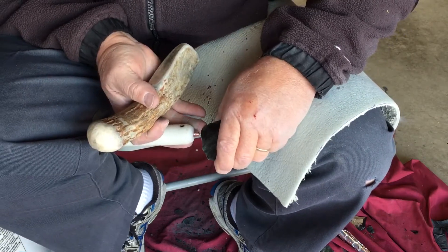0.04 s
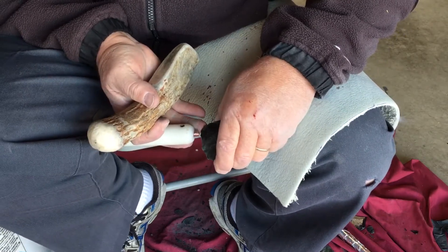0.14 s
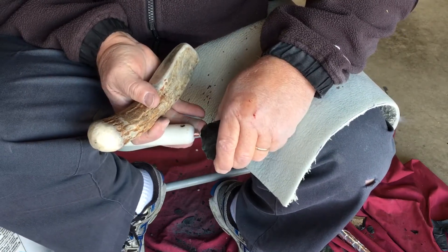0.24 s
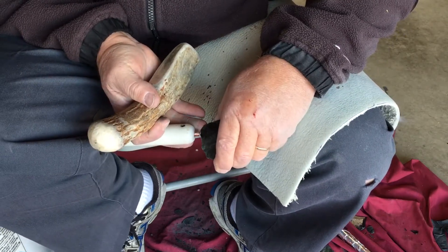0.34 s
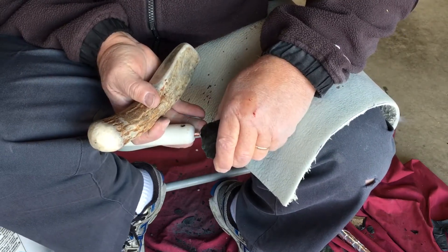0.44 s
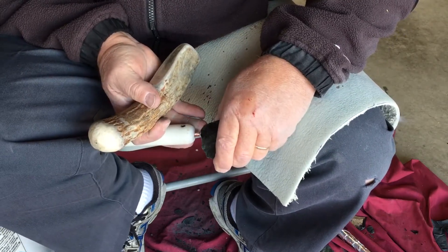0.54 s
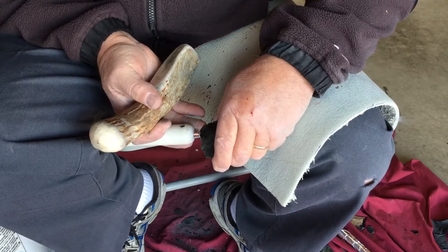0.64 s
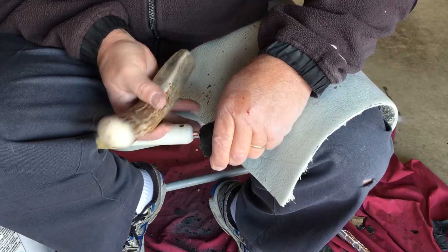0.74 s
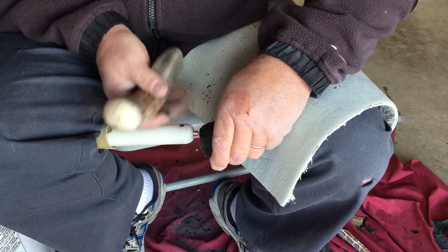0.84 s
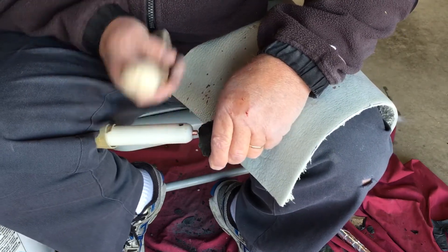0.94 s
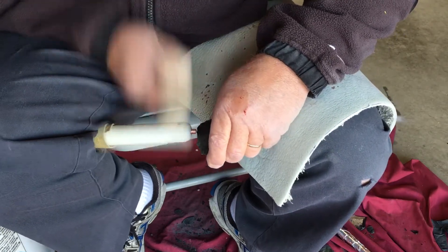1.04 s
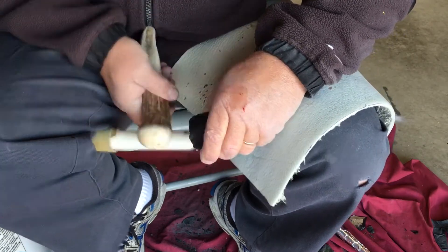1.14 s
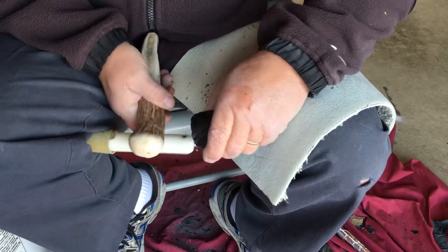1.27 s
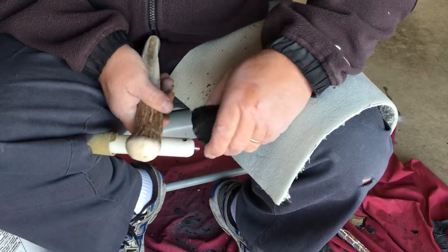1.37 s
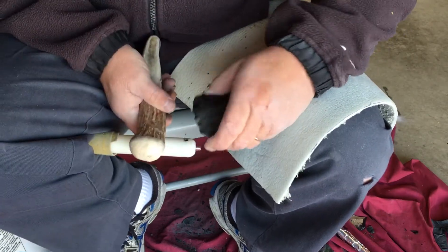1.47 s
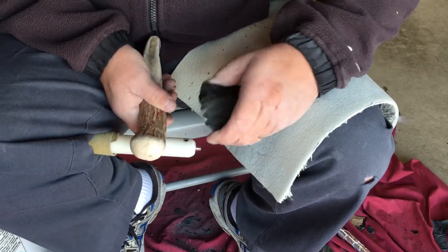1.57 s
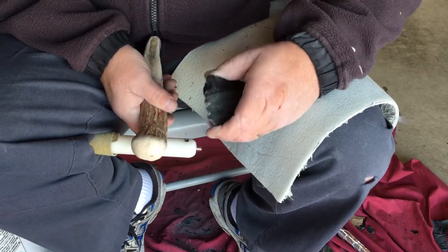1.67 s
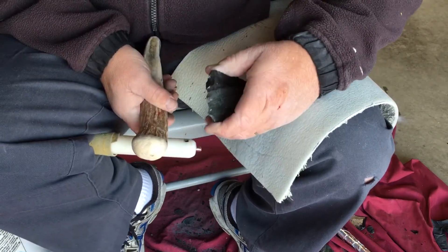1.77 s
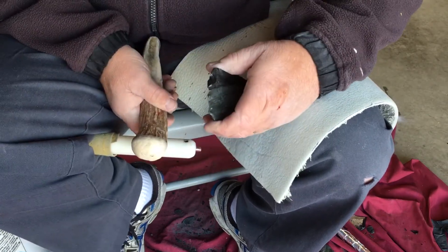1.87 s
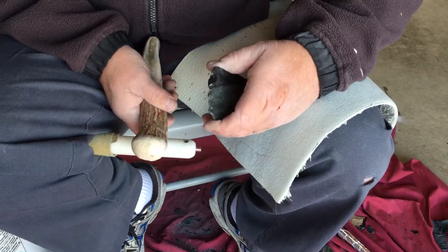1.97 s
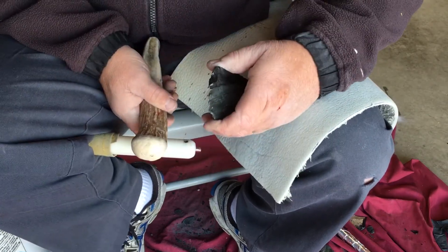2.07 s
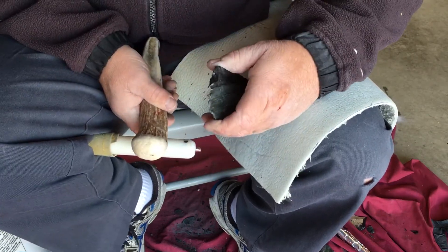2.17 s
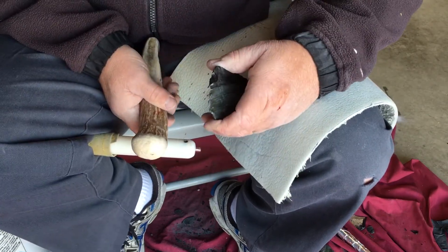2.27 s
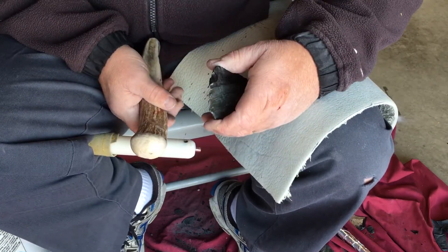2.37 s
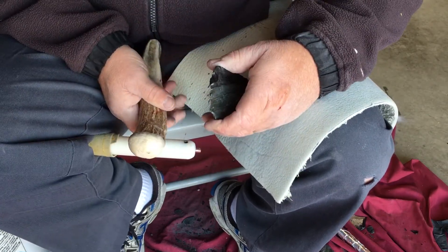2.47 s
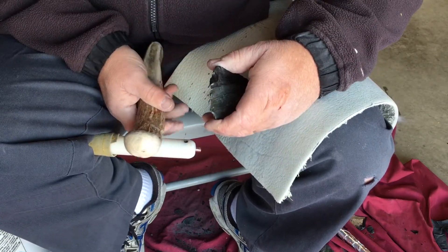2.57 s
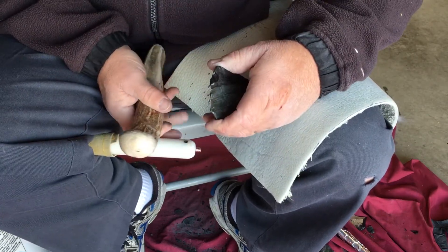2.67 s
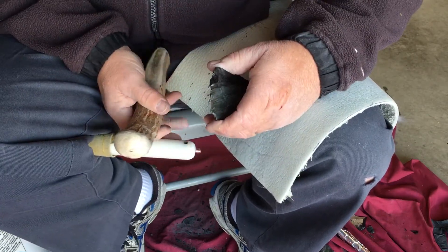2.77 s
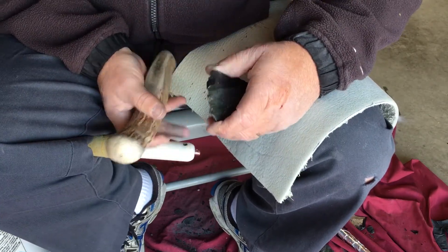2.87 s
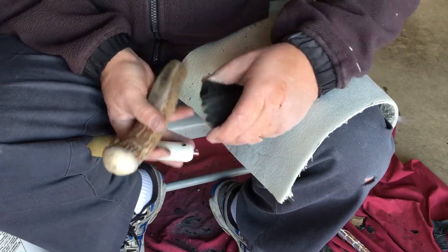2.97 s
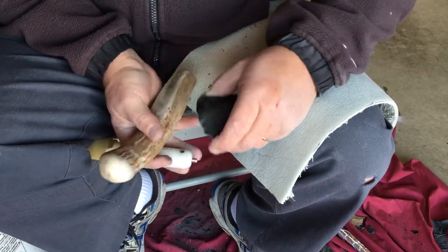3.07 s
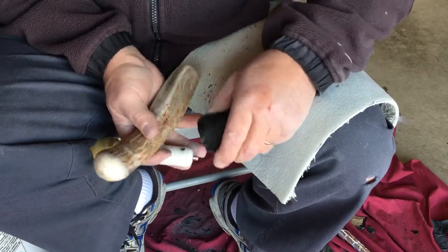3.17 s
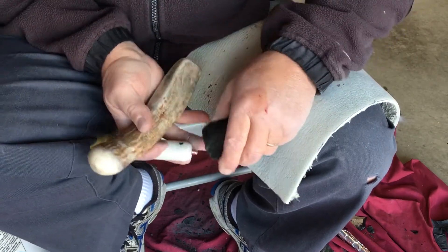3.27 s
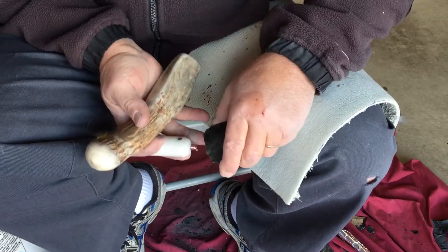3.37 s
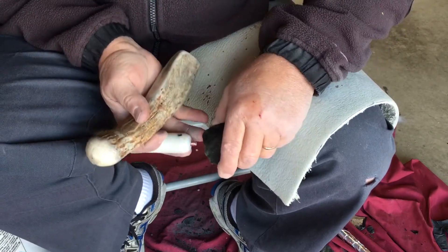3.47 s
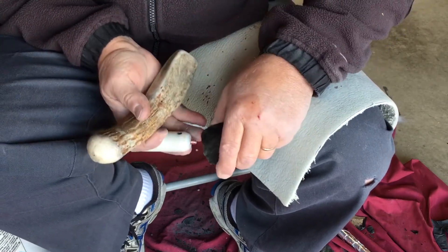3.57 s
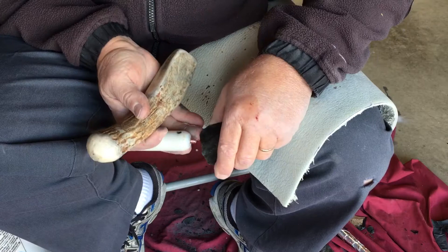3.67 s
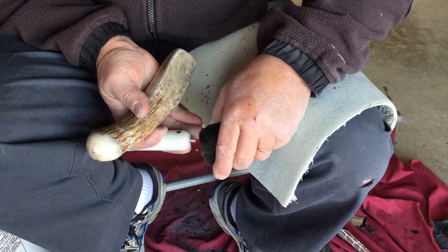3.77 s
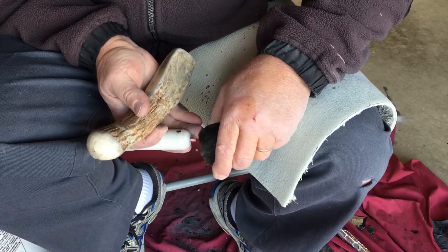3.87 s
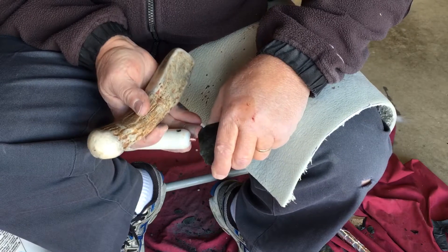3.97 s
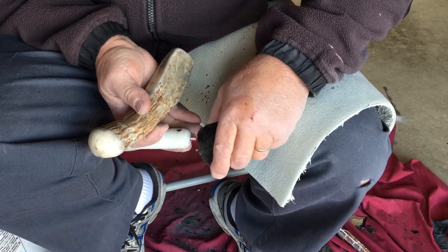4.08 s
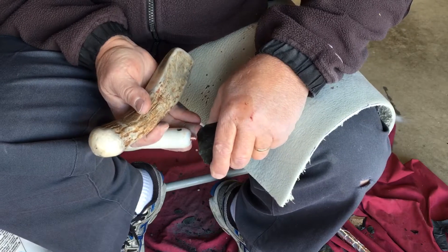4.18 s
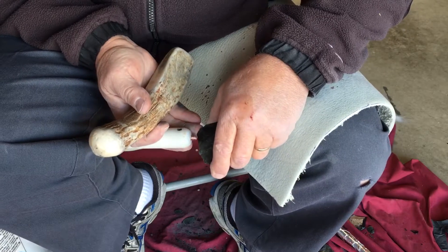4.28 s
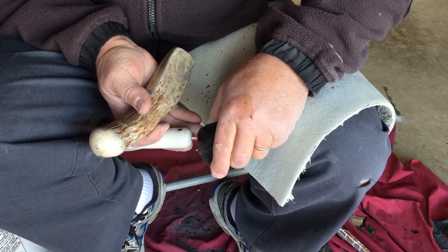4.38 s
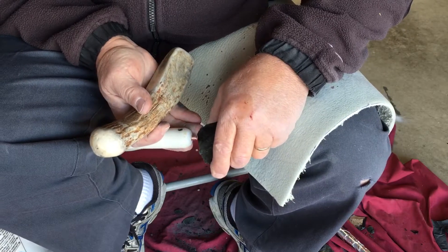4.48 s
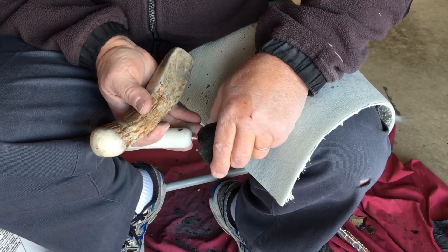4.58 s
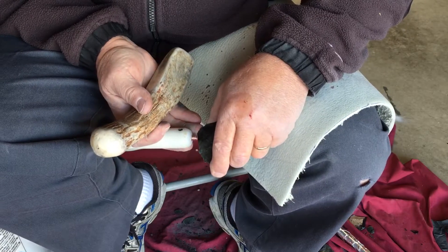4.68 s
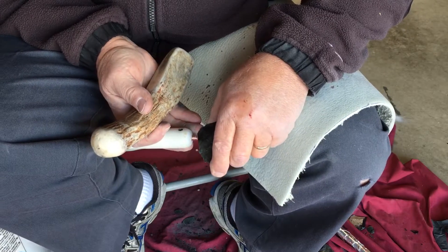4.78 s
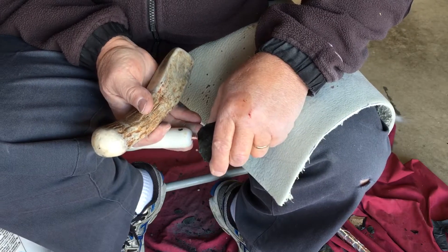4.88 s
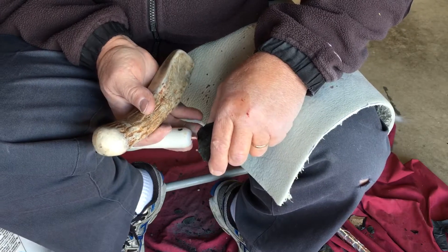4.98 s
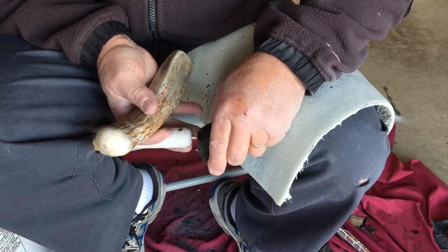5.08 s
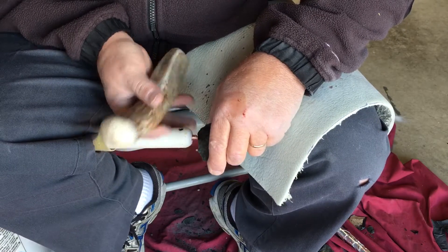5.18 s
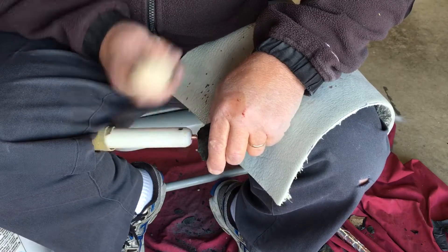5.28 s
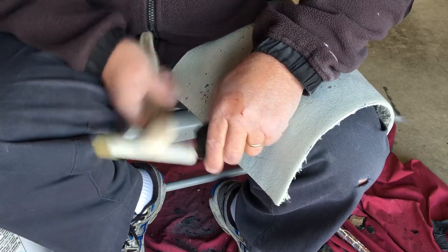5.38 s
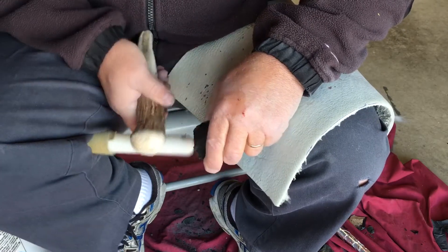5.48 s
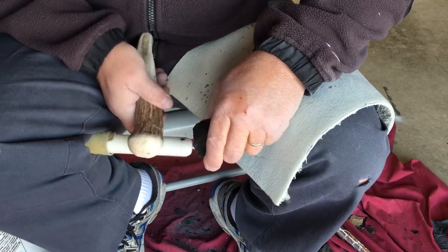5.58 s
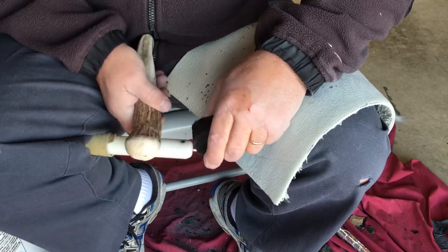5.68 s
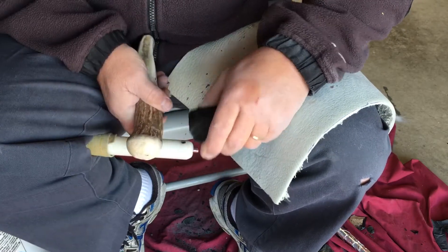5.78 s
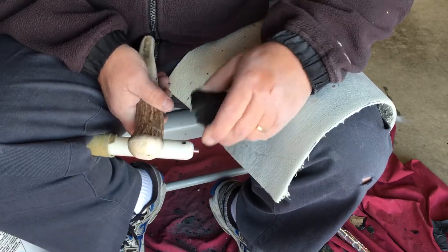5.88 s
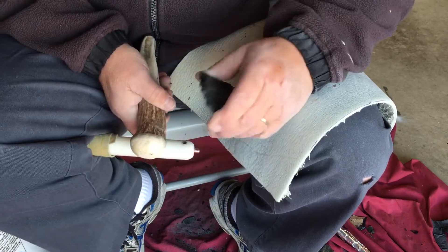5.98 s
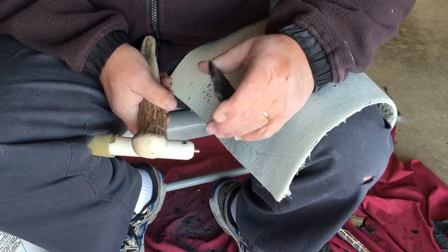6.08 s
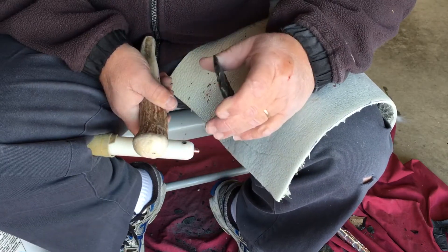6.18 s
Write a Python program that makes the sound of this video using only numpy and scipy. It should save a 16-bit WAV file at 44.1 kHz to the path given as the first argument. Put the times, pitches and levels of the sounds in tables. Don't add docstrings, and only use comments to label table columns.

```python
import sys
import numpy as np
from scipy import signal
from scipy.fft import rfft, irfft
from scipy.io import wavfile

SR = 44100
rng = np.random.default_rng(int(sys.argv[2]) if len(sys.argv) > 2 else 0)


def bounce(signal):
    frames = np.transpose(np.atleast_2d(signal))
    limited = np.clip(frames, -1, 1)
    pcm = np.round(limited * 32767).astype(np.int16)
    wavfile.write(sys.argv[1], SR, pcm)


def nominal_scale(level):
    x = np.asarray(level, float) / 20
    return 10 ** x


N = 274698


def sos(x, edges, kind, order=2):
    edges = np.clip(edges, 10, .45 * SR)
    return signal.sosfilt(signal.butter(order, edges, kind, fs=SR, output="sos"), x)


def rms_one(x):
    return x / np.sqrt(np.mean(x ** 2) + 1e-20)


def at_hz(points, hz):
    table_hz, value = np.transpose(points)
    return np.interp(np.log(hz), np.log(table_hz), value, left=-80, right=-80)


def drift(rate):
    r = np.exp(-80 * np.pi * rate / SR)
    slow = signal.lfilter([1], [1, -2 * r, r * r], rng.standard_normal(N // 40 + 2002))[2000:]
    return np.interp(np.arange(N) / 40, np.arange(len(slow)), rms_one(slow))


def ring(clicks, hz, t60):
    r = nominal_scale(-60 / (max(t60, .002) * SR))
    w = 2 * np.pi * hz / SR
    return signal.lfilter([0, np.sin(w)], [1, -2 * r * np.cos(w), r * r], clicks + 1e-18)


def dying(t60, size):
    return nominal_scale(-60 * np.arange(size) / SR / max(t60, .001))


def coloured_noise(spectrum, patchy_db):
    hz = np.fft.rfftfreq(N, 1 / SR) + 1
    noise = irfft(rfft(rng.standard_normal(N)) * nominal_scale(at_hz(spectrum, hz)), N)
    return rms_one(noise * nominal_scale(patchy_db * drift(22)))


def blows(contacts, body):
    s, peak_db, hard_db, thud_db, crack_db = np.transpose(contacts)
    start, size = round((s[0] - .005) * SR), SR // 2
    at = np.round(s * SR).astype(int) - start
    out = np.zeros(size)
    uneven = rng.normal(0, 1, (len(at), len(body)))
    for k, (hz, level_db, t60) in enumerate(body):
        clicks = np.zeros(size)
        colour_db = hard_db * max(np.log2(hz / 2400), 0) + thud_db * (hz < 1500)
        clicks[at] = nominal_scale(peak_db + level_db + colour_db + 1.3 * uneven[:, k]) * (-1) ** k
        out += ring(clicks, hz, t60)
    cracks = rng.standard_normal((len(at), 1500)) * dying(.02, size=1500)
    for i, gain, burst in zip(at, nominal_scale(peak_db + crack_db - 2), cracks):
        out[i:i + 1500] += gain * sos(burst, [1210, 6462], "band", order=1)
    out = sos(out, 230, "high", order=4)
    return np.pad(out, (start, N - start - size))


# start in seconds, then peak, hardness, dull thud and crack, all in dB.
FIRST_STRIKE = [
    (1.0375, -3, 1.5, -5, 2.5),
    (1.0389, -11.5, 1, -2, -0.5),
    (1.0409, -8, -1, 3, -1),
    (1.0432, -9, -1.5, -1.5, -4),
    (1.0512, -18, 1, -6.5, -1),
]
# mode in Hz, level in dB, t60 in seconds.
FIRST_BODY = [(370, -18.5, .035), (536.92, -18, .025), (735, -14, .035), (990, -8.5, 0.04),
              (1334.6, -10, 0.017), (1543.6, -18, 0.0034), (1901, -10.5, 0.045), (2255, -13, 0.05),
              (2371, -6, 0.06), (2497, -8, .06), (2629, -11.5, 0.035), (3248, -4.5, 0.02),
              (3750, -4, 0.015), (4600, -6, 0.031), (5540, -3, .015), (6800, -15, 0.0074),
              (9229.4, -13, 0.018), (13676, -20, 0.0055)]


def first_blow():
    return blows(FIRST_STRIKE, FIRST_BODY)


# start in seconds, then peak, hardness, dull thud and crack, all in dB.
SECOND_STRIKE = [
    (5.3534, -7, 2, -11, -1),
    (5.3561, -5.5, 1, 2, -2),
    (5.3578, -16, -5, 2, -3),
    (5.3665, -23, 0, -8, 0),
    (5.3688, -17, -12, -10, -7),
    (5.3768, -22, -10, -8, -7),
    (5.4555, -36, -8, -8, -6),
]
# mode in Hz, level in dB, t60 in seconds.
SECOND_BODY = [(358.4, -14.5, 0.025), (727, -12, 0.021), (985, -9.5, 0.04), (1460, -16, 0.0052),
               (1880, -11.5, 0.02), (2240, -12, 0.015), (2375, -.3, 0.03), (2500, -10, .03),
               (2700, -8, 0.015), (2990, -11, .015), (3335, -1.5, .025), (3690, -7.5, .012),
               (4090, -6, 0.012), (4640, -13, 0.03), (5800, -15, 0.012), (7400, -10, 0.01),
               (9700, -15, 0.008), (14000, -16, 0.0067)]


def second_blow():
    return blows(SECOND_STRIKE, SECOND_BODY)


# start in seconds, then peak, hardness, dull thud and crack, all in dB.
FIRST_REBOUND = [
    (1.1985, -27, -2.5, -2.5, 5),
    (1.1995, -25, -0.5, 3, -6),
    (1.2015, -37, 3, 3, -10),
    (1.2348, -43, -2, 4, -4.5),
]
LATER_REBOUNDS = [
    (1.3323, -37, 3.5, -15, 9),
    (1.3333, -30, 0.5, 6.5, -12),
    (1.3358, -31, -0.5, -6, -2),
    (1.3515, -42, -3, -10, -1),
    (1.4783, -42, -12, -1.5, -6),
]
# mode in Hz, level in dB, t60 in seconds.
PUNCH_UP = [(354, -22, 0.046), (1005, -4.5, 0.017), (1400, -4, 0.011), (1830, -1, 0.0069),
            (3192, -1.5, 0.015), (3970, -10, 0.0068), (6270, -8.5, .01), (9400, -18, .015),
            (11000, -29, 0.11), (13900, -20, .01)]
PUNCH_DOWN = [(359, -27.5, 0.035), (985, -10.5, 0.038), (1410, -2, 0.0066), (1790, -1, 0.018),
              (3160, 3.5, 0.0044), (4492, -4, 0.016), (6043, -9, 0.0075), (9320, -24, .015),
              (10800, -32.5, .09), (14500, -22.5, .01)]


def punch_rebounds():
    return blows(FIRST_REBOUND, PUNCH_UP) + blows(LATER_REBOUNDS, PUNCH_DOWN)


def swish():
    start_s, end_s, end_db, rise_db_per_s = 1.015, 1.038, -39.5, 950
    t = np.arange(N) / SR
    level_db = end_db + rise_db_per_s * np.minimum(t - end_s, 0)
    gain = nominal_scale(level_db) * (t > start_s) * (t < end_s)
    air = rng.standard_normal(N)
    hiss = rms_one(sos(air, [900, 4500], "band"))
    whine = rms_one(ring(air, 3100, .03))
    return gain * (hiss + nominal_scale(-1.5) * whine)


def grit(ticks, crumble_db):
    out = np.zeros(N)
    crumbs = rng.standard_normal((len(ticks), 400)) * dying(.009, size=400)
    for (s, peak_db, low_hz, high_hz), crumb in zip(ticks, crumbs):
        puff = nominal_scale(crumble_db) * crumb + (np.arange(400) == 0)
        tick = sos(puff, [.75 * low_hz, 1.15 * high_hz], "band", order=3)
        i = round(s * SR)
        out[i:i + 400] += nominal_scale(peak_db + 3.5) * tick / np.max(np.abs(tick))
    return out


# start in seconds, peak in dB, low and high edge in Hz.
TOUCHES = [(0.2952, -58.5, 2700, 3200), (0.5096, -57, 1300, 3800), (0.6654, -56, 4000, 12000),
           (0.9425, -53, 2850, 11900), (0.9665, -43.5, 2300, 10000), (0.9954, -48, 4000, 12600),
           (1.0143, -39, 2273, 4700), (1.5619, -52, 2200, 8900), (1.734, -54, 4600, 12220),
           (1.8327, -57, 2100, 11190), (3.2202, -56, 2767, 12170), (3.2583, -54.5, 2200, 12440),
           (4.6455, -44, 2285, 3700), (5.2902, -49, 2270, 5400), (5.3303, -34, 2300, 9000),
           (5.3418, -41, 2270, 8212), (5.866, -28, 6796, 14500), (5.874, -53, 4212, 9800)]


def touches():
    return grit(TOUCHES, crumble_db=-13.5)


# start in seconds, peak in dB.
SEATING = [(4.8374, -58), (4.8934, -49), (4.9005, -56), (4.9035, -55), (4.907, -56), (4.911, -55.5),
           (4.9377, -51), (4.943, -58), (4.9573, -56), (4.9742, -59), (4.985, -60), (4.9935, -50.5),
           (5.0055, -55), (5.013, -60), (5.029, -58), (5.0325, -55), (5.1068, -49), (5.111, -58)]


def seating():
    return grit([(s, peak_db, 5200, 12600) for s, peak_db in SEATING], crumble_db=-15.5)


# mode in Hz, level in dB, t60 in seconds.
TIP = [(4700, -9, .007), (5250, -8, .009), (9200, -11, .005), (12600, -11, .008)]


def tip():
    s, peak_db = np.transpose(SEATING)
    out = np.zeros(N)
    uneven = rng.normal(0, 1, (len(s), len(TIP)))
    for k, (hz, level_db, t60) in enumerate(TIP):
        clicks = np.zeros(N)
        clicks[np.round(s * SR).astype(int)] = nominal_scale(peak_db + level_db + 2.5 * uneven[:, k])
        out += ring(clicks, hz, t60)
    return out


# start in seconds, peak in dB, low edge in Hz.
SPLINTERS = [(5.2842, -50, 14000), (5.309, -53, 10000), (5.322, -53, 13000), (5.3303, -42, 13000),
             (5.337, -52, 12000), (5.3425, -50, 12000), (5.5075, -42, 9000), (5.5705, -42.5, 10000),
             (5.6044, -35, 7000), (5.6195, -48, 8000), (5.6588, -53, 7000), (5.6623, -50, 7500),
             (5.6905, -53, 8000), (5.7385, -52, 14000), (5.7455, -52, 13000), (5.7538, -49, 9000),
             (5.7602, -45, 7000), (5.782, -53, 9000), (5.7938, -46, 6000), (5.8186, -50, 9000),
             (5.8243, -46, 8000), (5.8332, -54.5, 9000), (5.8513, -49, 7300), (5.8545, -49, 7300),
             (5.959, -50, 7300)]


def splinters():
    return grit([(s, peak_db, low_hz, 14200) for s, peak_db, low_hz in SPLINTERS], crumble_db=-17)


# start in seconds, peak in dB, pitch in Hz, t60 in seconds.
FLAKES = [(.665, -66, 8200, .04), (4.6458, -43, 2000, .006), (4.6458, -45, 3400, .005),
          (.388, -66, 5400, .012), (.945, -62, 1050, .05), (4.838, -64, 12300, .012),
          (5.291, -56, 2500, .02), (5.331, -46, 2500, .012), (5.331, -46, 4200, .012),
          (5.294, -55, 5000, .025), (5.508, -50, 12500, .08), (5.643, -60, 14600, .018),
          (5.697, -55, 15000, .03), (5.697, -60, 8050, .045), (5.697, -65, 10000, .035),
          (5.8663, -30, 3750, .005), (5.8663, -34, 2260, .007), (5.8665, -34, 3000, .005),
          (5.8663, -39, 4540, .007), (5.8663, -37, 8030, .01)]


def flakes():
    out, t = np.zeros(N), np.arange(6000) / SR
    for s, peak_db, hz, t60 in FLAKES:
        i = round(s * SR)
        out[i:i + 6000] += nominal_scale(peak_db) * np.sin(2 * np.pi * hz * t) * dying(t60, size=6000)
    return sos(out, 1000, "high", order=3)


# start and end in seconds, grains per second, level in dB.
DUST = [
    (4.89, 5.12, 200, -57),
    (5.64, 5.9, 260, -53),
]


def dust():
    t, out = np.arange(N) / SR, np.zeros(N)
    sizes = nominal_scale(3.0 * np.minimum(rng.exponential(1, N), 3)) * rng.choice([-1, 1], N)
    chance = rng.random(N)
    for start, end, per_s, level_db in DUST:
        out += nominal_scale(level_db) * sizes * (chance < per_s / SR) * (t > start) * (t < end)
    return sos(out, 5500, "high", order=4)


# full speed from and until in seconds, rustle in dB,
# seconds to gather 10 dB, seconds to lose 10 dB.
MOVES = [(0.0, .1, -79, .1, .1), (.71, .93, -66, .08, .1), (.96, 1.04, -62, .06, .2),
         (1.3, 1.5, -67.5, .1, .22), (1.73, 1.75, -72.5, .05, .17), (2.48, 2.55, -73.5, .4, .3),
         (2.92, 3.1, -63.8, .17, .24), (3.5, 3.95, -79, .2, .5), (4.92, 5.05, -75, .1, .1),
         (5.18, 5.35, -63.5, .11, .15), (5.68, 5.88, -67, .08, .14), (6.0, 6.05, -76, .1, .2)]
# frequency in Hz, density in dB per Hz.
SLEEVE = [(1470, -29), (2500, -2), (2940, -4), (3460, -5.5), (5030, -9), (6550, -7), (7950, -11),
          (8730, -6), (10400, -10), (15200, -9.5), (16000, -14)]


def sleeves():
    t, power = np.arange(N) / SR, np.zeros(N)
    for start, end, level_db, rise, fall in MOVES:
        away = np.maximum(np.maximum((start - t) / rise, (t - end) / fall), 0)
        power += nominal_scale(2 * level_db - 20 * away ** 2)
    return np.sqrt(power) * coloured_noise(SLEEVE, patchy_db=.6)


# delay in seconds, level in dB.
ECHOES = [
    (.0035, -12),
    (0.0153, -14.5),
    (0.023, -21.5),
    (.038, -20),
]


def echoes(x, echo_db):
    back = sum(nominal_scale(level_db) * np.roll(x, round(delay * SR)) for delay, level_db in ECHOES)
    return nominal_scale(echo_db) * sos(back, 9000, "low", order=1)


# frequency in Hz, t60 in seconds.
SHED = [(200, 0.53), (500, 0.5), (1200, 0.5), (2500, 0.53), (5000, .42), (9000, 0.41), (15000, 0.19)]


def shed_tail(colour):
    size = SR
    hz = np.fft.rfftfreq(size, 1 / SR) + 1
    white = irfft(rfft(rng.standard_normal((2, size))) * nominal_scale(at_hz(colour, hz)), size)
    edges, tail = 140 * 2 ** np.arange(0, 7.1, .5), 0
    for k, (low, high) in enumerate(zip(edges, edges[1:])):
        centre_hz = np.clip(np.sqrt(low * high), SHED[0][0] + 1, SHED[-1][0] - 1)
        t60 = at_hz(SHED, centre_hz)
        fall = dying(t60, size) + nominal_scale(8.5) * dying(.22 * t60, size)
        tail = tail + sos(white[k % 2], [low, high], "band") * fall
    return tail * (1 - dying(0.024, size))


# frequency in Hz, density in dB per Hz.
EVEN_COLOUR = [(100, 0), (17000, 0)]


def shed_ringing(knocks, small):
    sent = nominal_scale(-52.0) * knocks + nominal_scale(-48.5) * small
    return signal.fftconvolve(sent, shed_tail(EVEN_COLOUR))[:N]


def knock_tail(knocks, colour, notes):
    out, tail = np.zeros(N + SR), shed_tail(colour)
    tail = tail + sum(nominal_scale(level_db) * ring(tail, hz, t60) for hz, level_db, t60 in notes)
    for s, level_db in knocks:
        i = round(s * SR)
        out[i:i + SR] += nominal_scale(level_db + 14) * tail
    return out[:N]


# start in seconds, level in dB.
FIRST_BLOW = [
    (1.039, -27),
]
SECOND_BLOW = [
    (5.355, -30),
]
PUNCH_KNOCKS = [
    (1.199, -52.5),
    (1.333, -58.5),
    (1.479, -72),
]
# frequency in Hz, density in dB per Hz.
FIRST_COLOUR = [(120, -48.5), (200, -17.5), (232, -20), (268, -19.5), (456, -14), (538, -18.5), (968, -4.5),
                (1480, -10.5), (2420, -3), (3070, -7.5), (5520, -12), (9400, -24.5), (10500, -34.5),
                (13300, -27.5), (16000, -31)]
SECOND_COLOUR = [(120, -47.5), (200, -18.5), (311, -15.5), (538, -19), (659, -11.5), (986, -6.5),
                 (1080, -11), (1710, -8), (2380, -3), (2860, -5.5), (4120, -6), (6640, -12), (7970, -16),
                 (14100, -21), (16000, -34)]
PUNCH_COLOUR = [(180, -35), (300, -4), (565, -27), (624, -7), (870, -6), (961, -11.5), (1340, -10),
                (1720, -5), (3290, -4.5), (16000, -30)]
# pitch in Hz, level in dB, t60 in seconds.
FIRST_NOTES = [(985, -60, .05), (1870, -50, .06), (2370, -53, .1), (2500, -54, .08), (2770, -55, .08),
               (3470, -57, .08), (5520, -52, .06)]
SECOND_NOTES = [(985, -56, .08), (1800, -63, .5), (1985, -53, .12), (2320, -63, .45), (2390, -57, .22),
                (2460, -55, .1), (3300, -51, .08), (4650, -54, .06)]
PUNCH_NOTES = [(985, -52, .1), (1800, -56, .07)]


def knocks_round_shed():
    out = knock_tail(FIRST_BLOW, FIRST_COLOUR, FIRST_NOTES)
    out += knock_tail(SECOND_BLOW, SECOND_COLOUR, SECOND_NOTES)
    return out + knock_tail(PUNCH_KNOCKS, PUNCH_COLOUR, PUNCH_NOTES)


# time in seconds, level in dB.
CAR = [
    (0, -70.5),
    (2.1, -69.5),
    (2.6, -64),
    (3.0, -60),
    (3.55, -58.5),
    (4.05, -51.5),
    (4.45, -56.5),
    (5.0, -59),
    (6.23, -63.5),
]


def tyre_level_db():
    s, level_db = np.transpose(CAR)
    return np.interp(np.arange(N) / SR, s, level_db)


# frequency in Hz, density in dB per Hz.
DRONE = [(76, -28), (130, 3), (172, 1), (216, -0.5), (364, -3.5), (398, -13.5), (600, -13), (780, -39.5),
         (1320, -120)]
TYRES = [(290, -37.5), (500, -14.5), (622, -9.5), (904, 0), (1050, -1.5), (1330, -2.5), (1650, -5),
         (1780, -6), (3150, -18.5), (5300, -34.5), (6000, -41), (7800, -67), (13200, -120)]


def car():
    far_db, near_db, nearest_s, pass_s = -70, -57, 3.68, .4
    engine = nominal_scale(near_db) / np.hypot(1, (np.arange(N) / SR - nearest_s) / pass_s)
    drone = np.hypot(engine, nominal_scale(far_db)) * coloured_noise(DRONE, patchy_db=3.5)
    return drone + nominal_scale(tyre_level_db()) * coloured_noise(TYRES, patchy_db=.3)


# start in seconds, peak in dB, pitch in Hz.
BUMPS = [
    (2.018, -39, 99.6),
    (2.748, -39, 78),
    (3.439, -37.5, 83.42),
    (3.614, -34.5, 75.31),
    (4.656, -39.5, 78),
]


def bumps():
    out, t = np.zeros(N), np.arange(6000) / SR
    swell = dying(0.077, size=6000) * (1 - dying(0.05, size=6000))
    for s, peak_db, hz in BUMPS:
        i = round(s * SR)
        out[i:i + 6000] += nominal_scale(peak_db + 5.0) * np.sin(2 * np.pi * hz * t) * swell
    return out


# start in seconds, length in seconds, peak in dB, pitch in Hz.
CHIRPS = [
    (.01, .19, -79, 3750),
    (2.3, .45, -76, 4400),
    (2.35, .4, -77, 3850),
    (5.812, .05, -63, 4480),
    (5.9, .045, -62, 4480),
    (5.935, .04, -59, 4470),
    (5.91, .06, -72, 7500),
]


def bird():
    out, air = np.zeros(N), rng.standard_normal((len(CHIRPS), SR // 2))
    for (s, length, peak_db, hz), puff in zip(CHIRPS, air):
        i, size = round(s * SR), round(length * SR)
        note = rms_one(ring(puff, hz, .035))[-size:]
        out[i:i + size] += nominal_scale(peak_db - 6) * np.hanning(size) * note
    return out


# frequency in Hz, density in dB per Hz.
HUM = [(12, -63), (20, -41), (27, -24.5), (38, -8.5), (70, -4.5), (92, -6.5), (112, -4), (130, -28.5),
       (160, -19), (210, -53), (350, -120)]


def traffic():
    level_db = -57 + .05 * (tyre_level_db() + 63)
    note = rms_one(ring(rng.standard_normal(N), 99, t60=0.2))
    return nominal_scale(level_db) * (coloured_noise(HUM, patchy_db=-1.5534) + nominal_scale(-1.5) * note)


# frequency in Hz, density in dB per Hz.
STILL_AIR = [(88, -40), (150, -7.5), (197, -5), (315, -15), (361, -15), (398, -4.5), (457, -23.5),
             (504, -12), (745, -17.5), (1390, -29), (1630, -22.5), (3770, -32), (4490, -31.5),
             (15100, -34.5), (16000, -42)]


def still_air():
    return nominal_scale(-67) * coloured_noise(STILL_AIR, patchy_db=.4)


def scene():
    knocks = first_blow() + second_blow() + punch_rebounds()
    small = touches() + seating() + tip() + splinters() + flakes() + dust()
    near = knocks + echoes(knocks, echo_db=-3.0) + small + echoes(small, echo_db=-11.0)
    shed = shed_ringing(knocks, small) + knocks_round_shed()
    outside = car() + bumps() + bird() + traffic()
    return (near + swish() + sleeves() + shed + outside + still_air())[None]


def low_pass(x):
    return signal.sosfilt(signal.butter(12, 16650, fs=SR, output="sos"), x)


def record(dry):
    fall = 70 * np.arange(N) / SR
    level_db = 20 * np.log10(np.abs(dry[0]) + 1e-9)
    held_db = np.maximum.accumulate(level_db + fall) - fall
    cut_db = 0.13 * np.maximum(held_db + 10.5, 0)
    cut_db = signal.lfilter([.02], [1, -.98], cut_db)
    x = sos(dry * nominal_scale(-cut_db), 36, "high")
    x = x - 0.27 * signal.lfilter(*signal.iirpeak(10500, 9.0, fs=SR), x)
    rounding = .85 * np.tanh(x / .85) - x
    x = sos(x + sos(rounding, 200, "high"), 15950, "low", order=24)
    return low_pass(x)


dry = scene()
out = record(dry)
bounce(out)
```